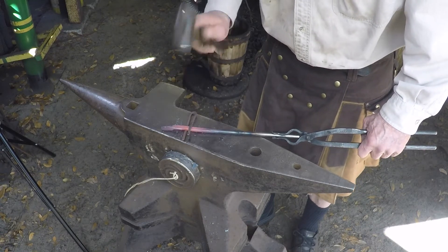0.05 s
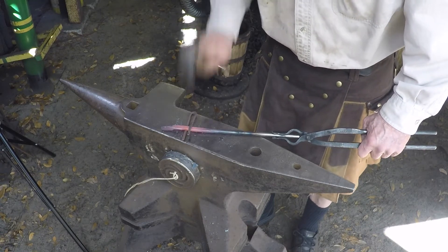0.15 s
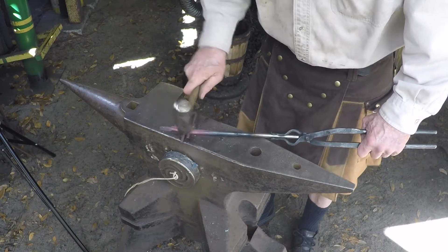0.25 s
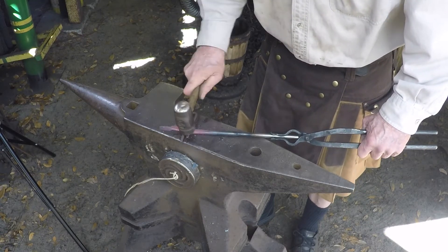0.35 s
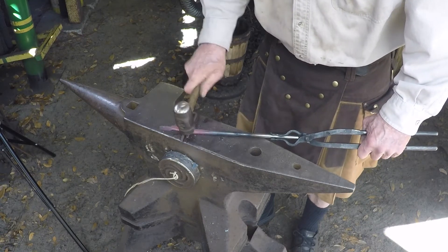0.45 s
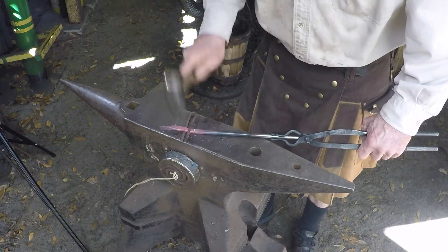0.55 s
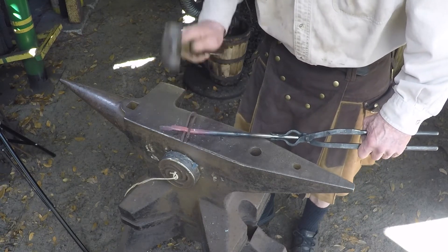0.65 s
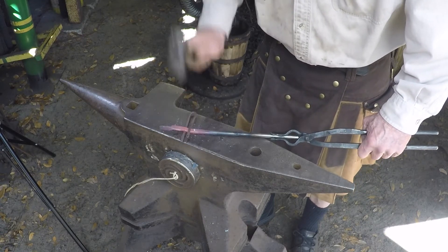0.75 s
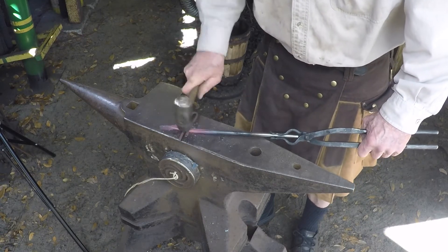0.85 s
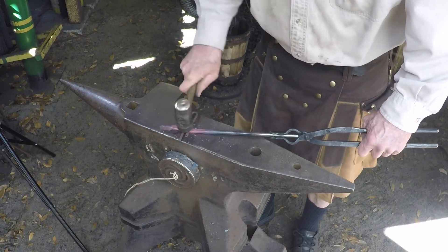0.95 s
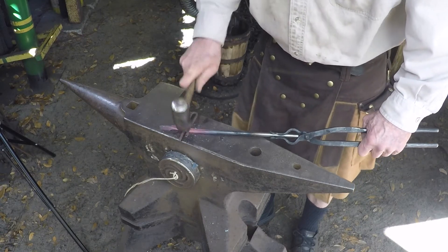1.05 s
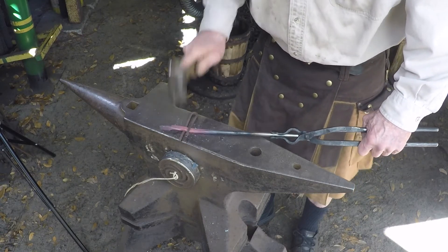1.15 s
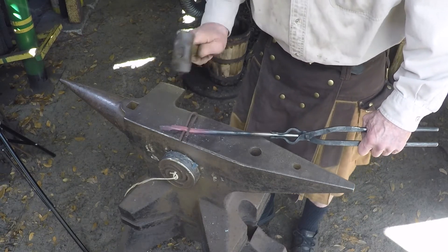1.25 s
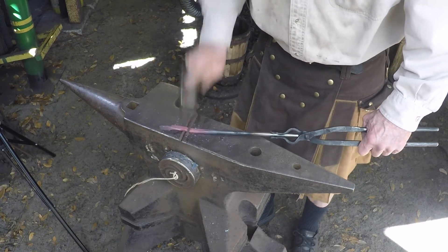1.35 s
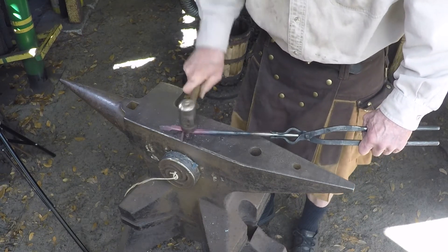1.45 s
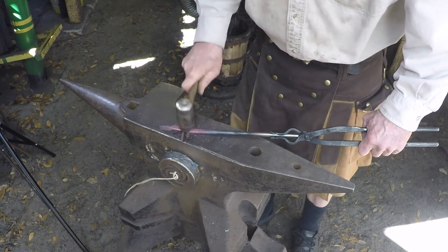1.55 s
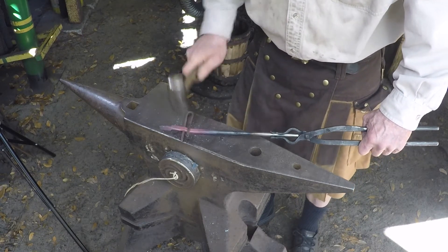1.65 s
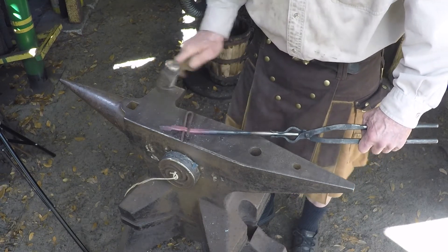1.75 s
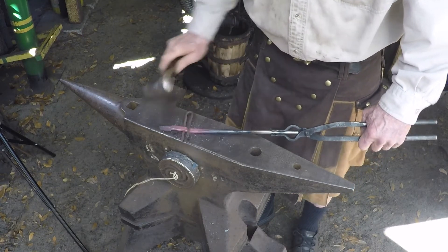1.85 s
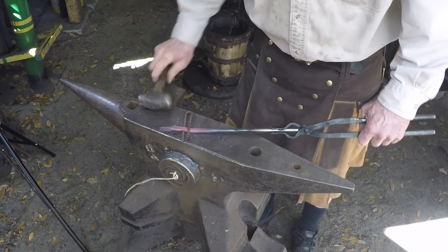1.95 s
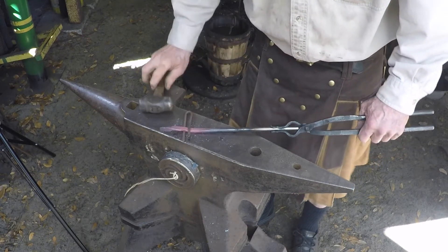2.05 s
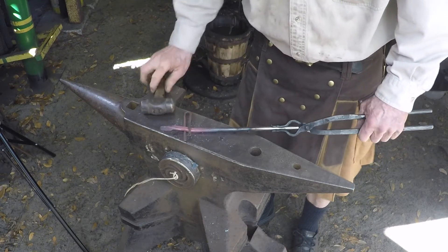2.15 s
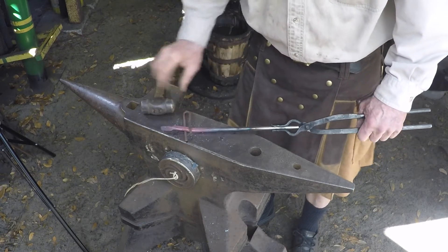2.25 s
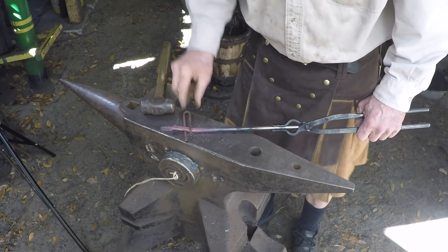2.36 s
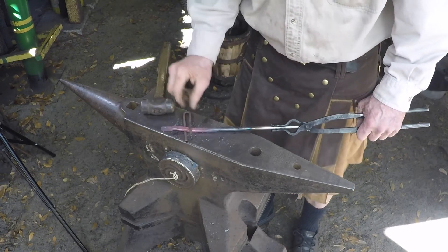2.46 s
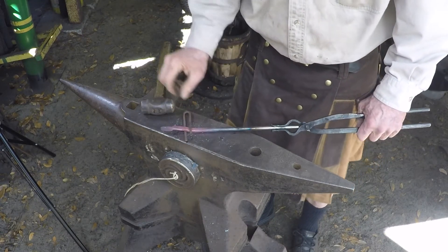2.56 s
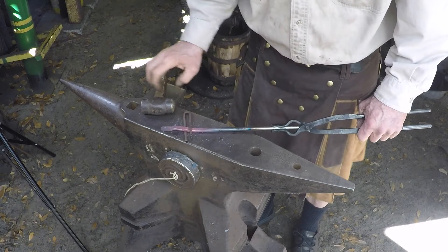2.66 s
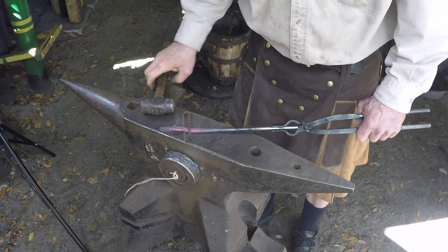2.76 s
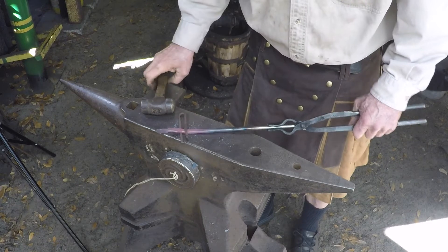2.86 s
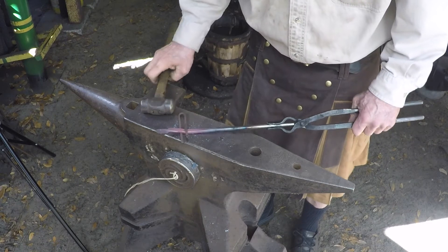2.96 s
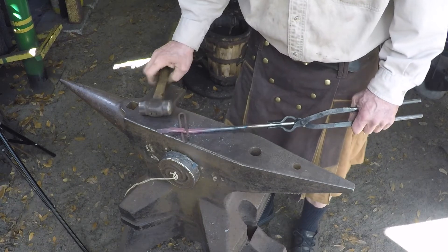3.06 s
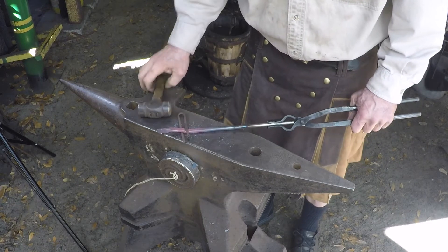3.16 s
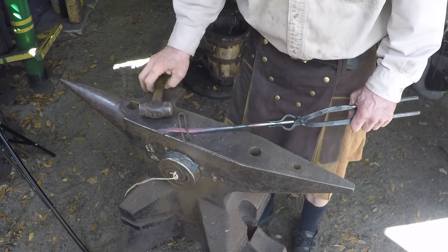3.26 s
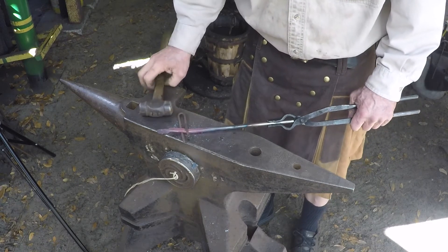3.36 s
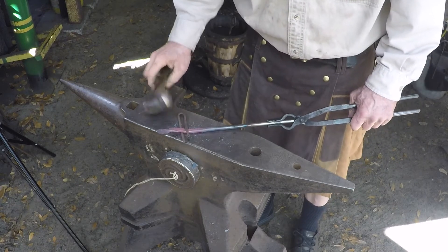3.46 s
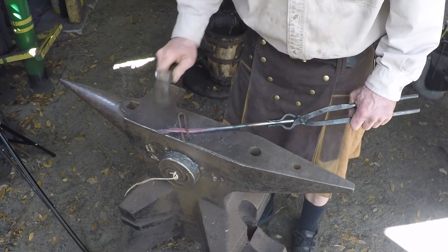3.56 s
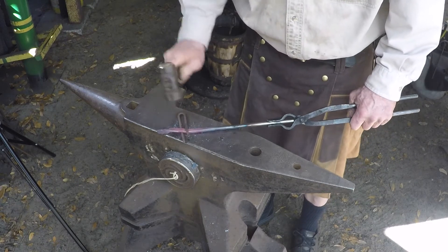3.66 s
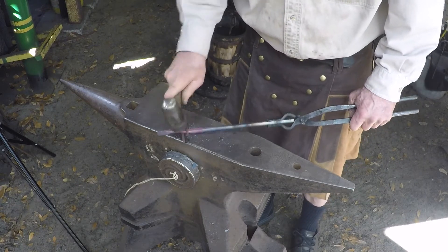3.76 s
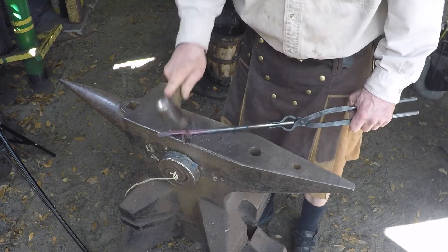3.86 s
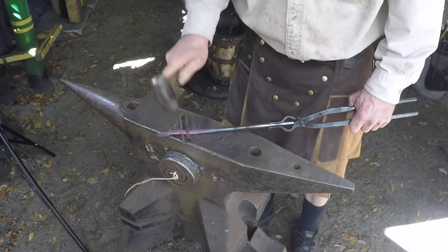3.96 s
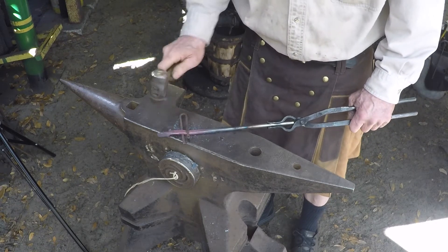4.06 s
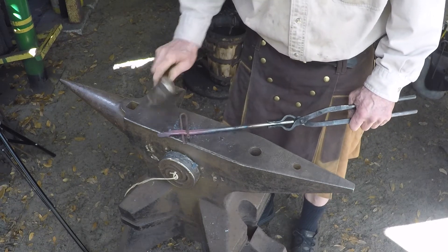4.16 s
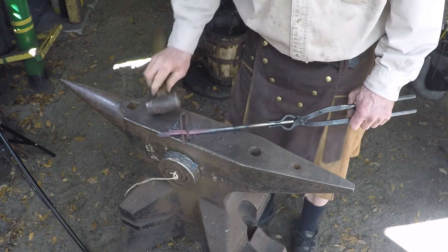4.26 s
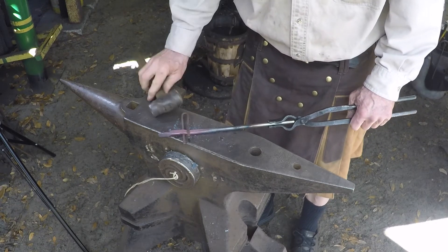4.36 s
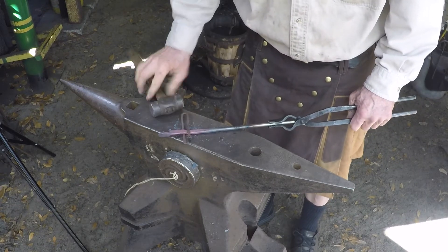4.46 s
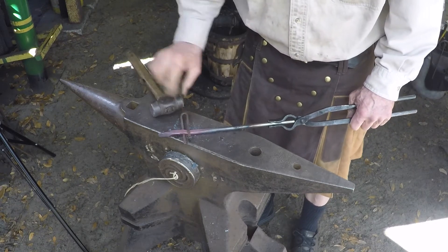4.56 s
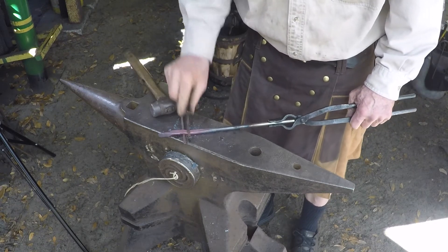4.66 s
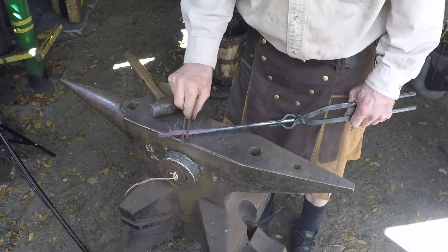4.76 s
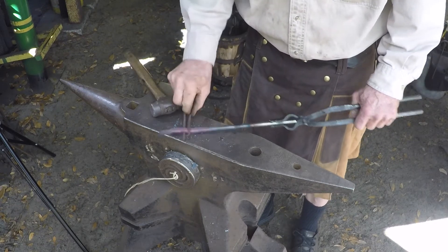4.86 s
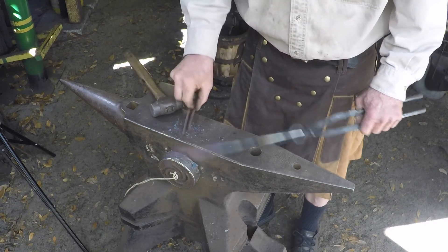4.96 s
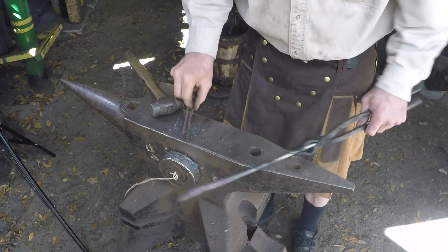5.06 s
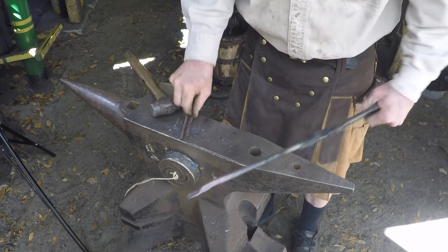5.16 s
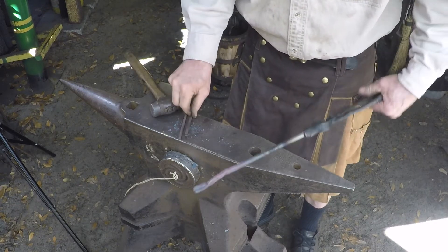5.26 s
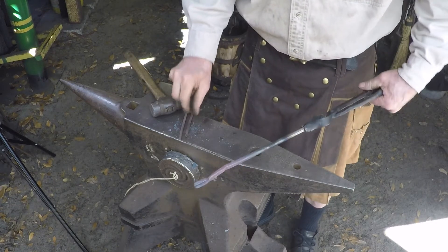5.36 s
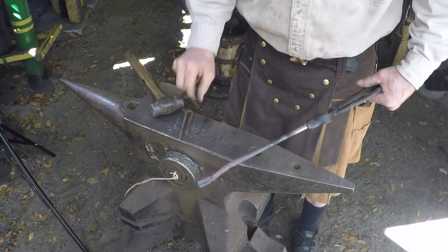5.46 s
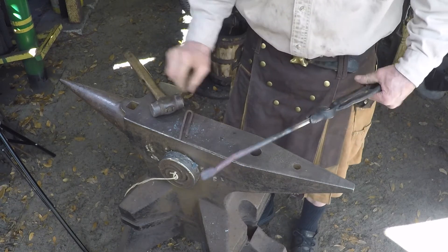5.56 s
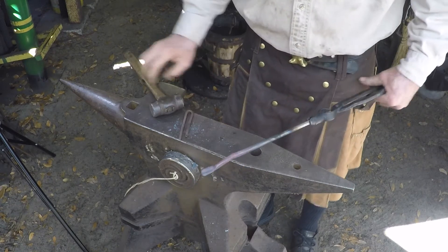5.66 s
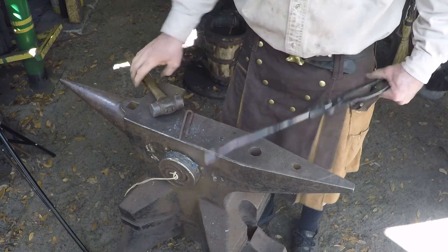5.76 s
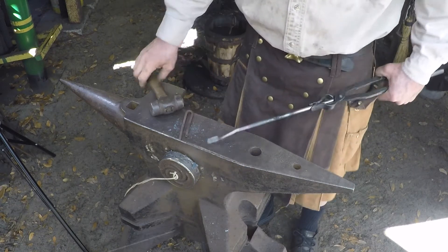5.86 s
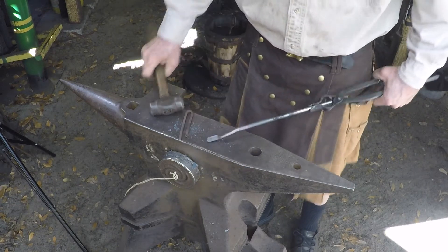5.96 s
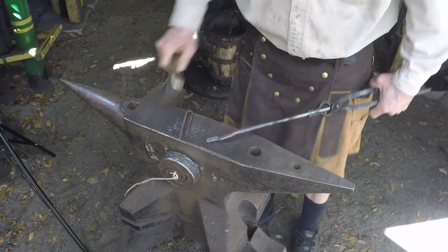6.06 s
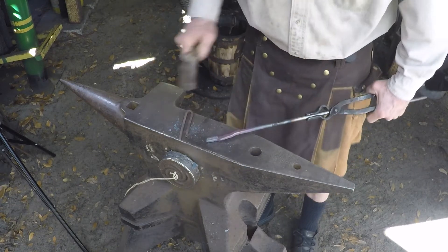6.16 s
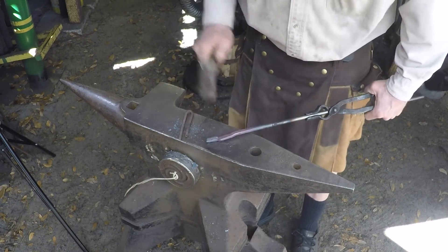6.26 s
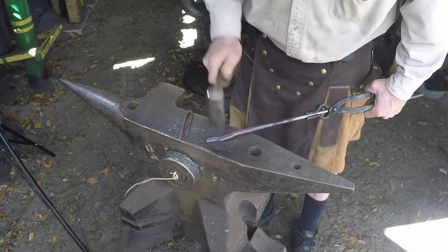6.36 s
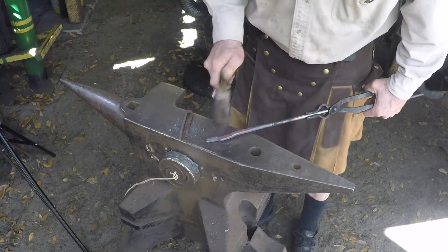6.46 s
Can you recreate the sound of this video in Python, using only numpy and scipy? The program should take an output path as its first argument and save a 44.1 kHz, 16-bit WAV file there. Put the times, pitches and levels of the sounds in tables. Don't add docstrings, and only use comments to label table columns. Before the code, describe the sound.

Close in an open shed, a hammer drives a small tool into hot iron on an anvil: three hard clanking blows with thud, crack and ring. The hammer then lands on the anvil face with a bright clang and quick chatter, rocks again softly, taps once, and drops with another ringing rattle. Small iron ticks follow. Low wind rumbles on the microphone.

```python
import sys
import numpy as np
from scipy import signal
from scipy.fft import rfft, irfft
from scipy.io import wavfile
from scipy.ndimage import uniform_filter1d

SR = 44100
rng = np.random.default_rng(int(sys.argv[2]) if len(sys.argv) > 2 else 0)


def magnitude_from_level(level_db):
    exponent = np.asarray(level_db, float) / 20
    return 10 ** exponent


def transcribe(signal):
    frames = np.atleast_2d(signal).T
    limited = np.clip(frames, -1, 1)
    pcm = np.round(limited * 32767).astype(np.int16)
    wavfile.write(sys.argv[1], SR, pcm)


N = 286914

ANVIL_HZ = [1120, 1357, 2234, 2412, 2794, 3381, 4258, 4420, 4484, 4904, 5211, 5450, 5696, 6261, 6481, 7407,
            7504, 7930, 8086, 8561, 8971, 9383, 10280, 10760, 12060, 12340, 13370, 13950, 14780, 15105]
ANVIL_T60 = [2.07, 0.27, 0.39, 0.18, 0.79, 0.26, 0.24, 0.72, 0.85, 3.21, 1.16, 1.29, 1.92, 0.81, 0.78, 0.3,
             0.35, 0.71, 0.29, 0.72, 0.34, 0.92, 0.41, 0.46, 0.81, 0.72, 0.97, 0.52, 0.75, 0.47]


def evened(x):
    return x / np.sqrt(np.mean(x ** 2) + 1e-20)


def read(points, hz):
    f, value = np.transpose(points)
    return np.interp(np.log(hz + 1), np.log(f + 1), value)


def add(mix, s, sound):
    part = mix[round(s * SR):][:len(sound)]
    part += sound[:len(part)]


def coloured(x, points):
    hz = np.fft.rfftfreq(len(x), 1 / SR)
    inside = (hz > points[0][0]) & (hz < points[-1][0])
    return evened(irfft(rfft(x) * magnitude_from_level(read(points, hz)) * inside, len(x)))


def ring(t, hz, db, t60, phase=0):
    return magnitude_from_level(db - 60 * t / t60) * np.sin(2 * np.pi * hz * t + phase)


def burst(t, rise, fall):
    return (1 - np.exp(-t / rise)) * np.exp(-t / fall)


def soft(t, contact):
    return np.sin(np.pi / 2 * np.clip(t / contact, 0, 1)) ** 2


def air():
    # (time [s], level [dB])
    wind_levels = [(0.0, -33.5), (0.16, -48.5), (0.36, -35.5), (0.65, -48.5), (1.21, -41), (1.49, -58.5),
                   (1.59, -39.5), (1.96, -48.5), (2.17, -36.5), (2.59, -51), (3.6, -50), (3.91, -45),
                   (4.29, -53.5), (4.46, -35.5), (4.73, -43.5), (5.0, -42.5), (5.8, -53), (6.51, -51)]
    # (frequency [Hz], level per Hz [dB])
    wind_colour = [(7.1, -36), (12, -1), (46, -3.5), (61, -6.5), (81, -10), (226, -31.5), (258, -28.5),
                   (400, -40.5), (520, -60.5), (880, -120)]
    # (frequency [Hz], level per Hz [dB])
    hush_colour = [(71, -30), (120, -1), (188, -11), (222, -8), (314, -10.5), (370, -11.5), (569, -14.5),
                   (605, -13.5), (949, -15), (1720, -28), (5080, -30), (14700, -43), (16000, -52.5)]
    hush_db, swell_db, swells_per_s = -53.5, 1.07, 2.2

    t = np.arange(N) / SR
    lumps = evened(uniform_filter1d(uniform_filter1d(rng.standard_normal(N), 1500), 1500))
    gusts = evened(coloured(rng.standard_normal(N), wind_colour) * magnitude_from_level(1.78 * lumps))
    wind = gusts * magnitude_from_level(np.interp(t, *np.transpose(wind_levels)) + 5.0)

    hz, frames = np.fft.rfftfreq(1024, 1 / SR), N // 256 + 5
    a, b, patches = rng.standard_normal((frames, 513, 3)).T
    patches = evened(uniform_filter1d(uniform_filter1d(patches, 10, 0), 14, 1))
    rates = np.geomspace(.2, swells_per_s, 20)
    moments = np.arange(frames) * 256 / SR
    swell = evened(sum(np.sin(2 * np.pi * (f * moments + rng.random())) / np.sqrt(f) for f in rates))
    low_db = swell_db * swell / (1 + (hz[:, None] / 1300) ** 4)
    level = magnitude_from_level(read(hush_colour, hz)[:, None] + low_db + 1.9 * patches)
    spectrum = (a + 1j * b) * level * (hz > 110)[:, None]
    hush = signal.istft(spectrum, nperseg=1024, noverlap=768)[1][:N]
    return wind + magnitude_from_level(hush_db) * evened(hush)


def blows():
    # (time [s], thud level [dB], crack level [dB], stump level [dB], tool shiver level [dB])
    struck = [
        (0.237, -1.5, -13, -25.5, -16),
        (0.86, 5, -12.5, -27.5, -17.5),
        (1.415, 6, -15, -25, -17),
        (3.787, -21.5, -25.5, -38, -30.5),
    ]
    # (time [s], thud level [dB], crack level [dB], stump level [dB], shiver level [dB])
    dropped = [
        (2.007, -24, -44, -44.5, -26),
        (3.112, -39, -64.5, -47.5, -49),
        (4.282, -39, -26, -39.5, -21.5),
    ]
    # (frequency [Hz], width [Hz], level [dB])
    thud_modes = [(970, 780, 11), (1300, 450, 2), (1956, 950, 8.5), (3390, 190, -21.5)]
    # (frequency [Hz], level per Hz [dB])
    crack_colour = [(880, -31), (1500, -27), (1725, 3), (2410, -34), (2720, -5), (5280, -10), (11100, -6),
                    (14300, -9), (16000, -31)]
    # (frequency [Hz], level per Hz [dB])
    shiver_colour = [(71, 14.5), (120, 1.5), (988, -1.5), (1120, -10.5), (1260, 0.5), (1370, -11.5),
                     (3740, -10), (5300, -3), (5990, -7.5), (15000, -28.5), (16000, -48.5)]
    # (frequency [Hz], level [dB], time to die by 60 dB [s])
    stump_modes = [(49, 4, 0.65), (90.7, 4, 0.41), (195, -8, 0.6), (460, 3.5, 0.091), (700, -42.5, 0.51)]
    # (delay [s], frequency [Hz], level [dB])
    far_wall = [(.075, 195, -30.5), (.1, 460, -32.5), (.17, 646, -41.5)]

    sharp, low, t = np.zeros(N), np.zeros(N), np.arange(SR // 2) / SR
    thud = sum(-ring(t, hz, db, 3.56 / width) for hz, width, db in thud_modes) * soft(t, 0.00072)
    for s, thud_db, crack_db, stump_db, shiver_db in struck + dropped:
        a, b = rng.standard_normal((2, len(t)))
        add(sharp, s, magnitude_from_level(thud_db + 0.5) * thud)
        add(sharp, s, magnitude_from_level(crack_db) * coloured(a, crack_colour) * burst(t, 0.00035, 0.0045))
        add(low, s, magnitude_from_level(shiver_db) * coloured(b, shiver_colour) * burst(t, 0.002, 0.042))
        stump = np.zeros(len(t))
        for hz, db, t60 in stump_modes:
            stump += ring(t, hz * rng.uniform(1.0, 1.04), db, t60, rng.uniform(0, 17))
        add(low, s, magnitude_from_level(stump_db + 4.5) * stump * (1 - np.exp(-t / 0.008)))
        for delay, hz, db in far_wall:
            answer = ring(t, hz * rng.uniform(0.96, 1.03), thud_db + db + 11.0, 0.13)
            add(low, s + delay, answer * soft(t, 0.042))
    return sharp, low


def anvil():
    # (time [s], strength [dB], place from horn to heel [about -1.2 to 0.6, 0 mid-face],
    strikes = [
        (.237, -14, 0.5, -0.58, -3.6),
        (.861, -9, 0.14, 0.41, -4.5),
        (1.414, -8, 0.15, 0.8, -1.7),
        (2.008, 0, -0.28, 0.016, 8),
        (3.161, -24.5, -1.18, 0.55, -4),
        (3.787, -24.7, 0.55, .41, 8),
        (4.279, 1.66, 0.37, -0.81, 21),
        (5.887, -43.5, .3, -0.55, 8),
    ]
    # (time of that contact [s], change of
    # the ring's level from then on [dB], damping by what rests on the face [1/s])
    mutes = [
        (.860, -22, 0.058),
        (1.414, -30, 0.053),
        (2.008, -35, 0.026),
        (2.87, -6.5, 0.21),
        (3.786, -12.5, 0.073),
        (4.280, -19.5, 0.065),
        (5.886, 2.5, 0.016),
        (6.4, -1, 0.22),
    ]
    # (level struck mid-face [dB], gain towards heel [dB], gain towards far edge [dB])
    shapes = [(-27.5, -5, 9), (-13.5, 2.5, 12.5), (-28, -7.5, -5.5), (-17.5, 12.5, 11), (-35.5, -18, -3.5),
              (-18, 0.5, -0.5), (-15.5, -6.5, -0.5), (-22.0, -4.5, -5), (-32, -21, -4.5), (-33, -8, 3),
              (-21.5, 1, 4), (-27, -7.5, 10), (-34, -7, 7.5), (-19.5, -5.5, -4.0), (-34.5, -8.0, 3.5),
              (-43, 4.5, 2.0), (-39.5, -10, -6.0), (-45, -5.5, -9.5), (-42, -2, -4), (-45, -1, -8.5),
              (-39.5, 8, -1.5), (-33, 1.5, 0), (-36.5, 14.5, 1.5), (-42.0, 15.5, -2), (-42, 12.5, -3),
              (-45.5, 12.5, -5.5), (-49.5, -4.5, -8), (-42.5, 18.5, -7.5), (-51.0, 0, 6.5),
              (-36.5, 13.0, -4.0)]
    flat_gains = [-5, -7.5, -3.5, 4.5, -2, -2.5, -2, -4, -4, -1.5, -1, 5.5, 4.5, 2, 6.5, -2, 0, 6, -1, 6.5,
                  -2, 4, 4, 6.5, 0, -2.5, -2, 1.5, -2, -1.5]
    flatness = [-0.12, -0.46, -.1, 0.9, -0.2, 0.079, 0.084, 0.097]
    build_times = [.016, .016, 0.011, 0.14, 0.04, .016, .03, 0.017]
    dull_hz = 11200

    out, t = np.zeros(N), np.arange(3 * SR) / SR
    phases = 2 * np.pi * rng.random((len(strikes), len(ANVIL_HZ)))
    top = 1 / (1 + (dull_hz / np.array(ANVIL_HZ)) ** 16)
    for strike, mute, flat, build, turns in zip(strikes, mutes, flatness, build_times, phases):
        s, force_db, along, across, dull_db = strike
        mute_s, left_db, load = mute
        tone = np.zeros(len(t))
        place_db = np.array(shapes) @ [1, along, across]
        levels_db = force_db + place_db + flat * np.array(flat_gains) - dull_db * top
        for hz, t60, db, phase in zip(ANVIL_HZ, ANVIL_T60, levels_db, turns):
            heard = t[:int(min(t60 * 1.1, 3) * SR)]
            loaded_t60 = 1 / (1 / t60 + abs(load))
            add(tone, 0, ring(heard, hz, db, loaded_t60, phase) * soft(heard, build * min(t60, 1)))
        muted = magnitude_from_level(left_db * soft(t - (mute_s - s), 0.022))
        swell = soft(t, 0.012)
        ending = np.minimum(1, 5 * (t[-1] - t))
        add(out, s, magnitude_from_level(2.5) * tone * swell * muted * ending)
    return out


def shed(x, echo_db, tail_db):
    # (delay [s], level [dB])
    echoes = [(.0032, -32), (0.0102, -11), (0.0113, -8), (.0185, -15), (.0222, -24.5), (.029, -25.5)]
    # (frequency [Hz], time to die by 60 dB [s])
    shed_t60 = [(150, 0.99), (700, 0.39), (2000, 0.28), (5000, 0.31), (12000, 0.24)]

    taps = np.zeros(SR)
    at = np.arange(60, SR - 20, 20)
    taps[at + rng.integers(0, 20, len(at))] = rng.choice([-1., 1.], len(at))
    hz, t, z = signal.stft(taps, SR, nperseg=256)
    dying = magnitude_from_level(-60 * t / read(shed_t60, hz)[:, None])
    tail = signal.istft(z * dying, SR, nperseg=256)[1][:SR]
    response = magnitude_from_level(tail_db) * tail / np.linalg.norm(tail)
    for s, db in echoes:
        add(response, s, np.array([magnitude_from_level(db + echo_db)]))
    return x + signal.fftconvolve(x, response)[:N]


def knock(t, handle_hz, head_hz, handle_db, edge_db):
    grit_band = signal.butter(4, [1500, 6000], "band", fs=SR, output="sos")
    steel_band = signal.butter(4, [4300, 7200], "band", fs=SR, output="sos")
    head = ring(t, head_hz, 0, .013) + ring(t, head_hz * 1.35, -8, .007) + ring(t, head_hz * .58, -11, .01)
    handle = ring(t, handle_hz, handle_db, .02) + ring(t, handle_hz * 1.5, handle_db - 14, .012)
    a, b = rng.standard_normal((2, len(t)))
    grit = magnitude_from_level(-4) * signal.sosfilt(grit_band, a * burst(t, .0003, 0.0024))
    edge = magnitude_from_level(edge_db + 2.5) * signal.sosfilt(steel_band, b * burst(t, 0.00054, 0.0014))
    return head * soft(t, .0015) + handle * soft(t, .0012) + grit + edge


def knocks(grains):
    # (time [s], head clack level [dB], handle frequency [Hz], head frequency [Hz])
    contacts = [(1.975, -8, 820, 3020), (2.0076, -5, 1340, 3284), (2.0263, -8.5, 800, 3100),
                (2.0799, 0.3, 753, 3240), (2.112, -15, 1080, 3430), (2.1399, -14, 760, 3014),
                (2.1692, -20, 1040, 3500), (2.2036, -22, 1020, 3260), (2.2539, -43, 1080, 3460),
                (3.1139, -10, 820, 3160), (3.1619, -14.5, 790, 3160), (3.198, -13, 1150, 3300),
                (3.247, -15, 800, 3300), (3.2812, -30, 1150, 3040), (3.2934, -24, 830, 3200),
                (4.2659, -10.5, 840, 3100), (4.2803, -.6, 1323, 2400), (4.3314, 0.8, 1147, 2590),
                (4.4038, -13, 944, 2400), (4.4153, -30.5, 1130, 3390), (4.4294, -26, 780, 3280),
                (4.4506, -14.5, 1330, 3070), (4.4786, -20, 1260, 3250), (4.5, -19, 1029, 2430),
                (4.538, -25.5, 789, 3290), (4.5802, -25, 1050, 3430), (4.6044, -25, 903, 3190),
                (4.6244, -23, 874, 2380), (4.67, -44, 1310, 3380), (4.7146, -40.5, 1080, 2122)]
    quick_modes = [1, 2, 3, 5, 6, 7, 11]
    quick_levels = [-26, -28.5, -28.5, -28, -27.5, -34.5, -40.5]
    handle_base_db, handle_lean = -8.5, 0.34
    edge_base_db, edge_db_per_oct, heel_hz = -23, 30.5, 780
    steel_lean = 0.56

    out, pushes, t = np.zeros(N), magnitude_from_level(-19) * grains, np.arange(SR) / SR
    for s, db, handle_hz, head_hz in contacts:
        edge_db = edge_base_db + edge_db_per_oct * np.log2(handle_hz / heel_hz)
        sound = knock(t[:2000], handle_hz, head_hz, handle_base_db - handle_lean * db, edge_db)
        add(out, s - .0005, magnitude_from_level(db + 2.0) * sound)
        add(pushes, s, np.array([magnitude_from_level(steel_lean * db)]))
    quick = sum(ring(t, ANVIL_HZ[k], db, ANVIL_T60[k]) for k, db in zip(quick_modes, quick_levels))
    return out, signal.fftconvolve(pushes, quick * soft(t, 0.011))[:N]


def chatter():
    # (start [s], loudest [s], rest [s])
    settles = [
        (2.016, 2.144, 2.274),
        (3.1, 3.14, 3.295),
        (4.3, 4.46, 4.71),
    ]
    # (level [dB], fade [dB/s])
    strengths = [
        (-40.5, 114),
        (-44.5, 10.5),
        (-41.5, 61),
    ]
    rise_db, rest_db_per_s = 32, 270

    t, level = np.arange(N) / SR, np.zeros(N)
    happens = rng.random(N) < 180 / SR
    size = magnitude_from_level(4 * np.minimum(rng.exponential(1, N), 2.5)) * happens
    kind, grains = rng.integers(0, 12, N), np.zeros(N)
    pitches = rng.uniform([700, 2100], [1300, 4200], (12, 2))
    for k, (handle_hz, head_hz) in enumerate(pitches):
        sound = knock(t[:2000], handle_hz, head_hz, -1.5, -2.5)
        grains += signal.oaconvolve(size * (kind == k), sound)[:N]
    for (start, top, rest), (db, fade) in zip(settles, strengths):
        shy_db = rise_db * np.maximum(top - t, 0) / (top - start)
        lost_db = fade * (np.clip(t, top, rest) - top) + rest_db_per_s * np.maximum(t - rest, 0)
        level += magnitude_from_level(db + 9.0 - shy_db - lost_db) * (t > start)
    return evened(grains) * level


def small_iron():
    # (time [s], level [dB])
    tinks = [
        (5.1592, -38.5),
    ]
    # (frequency [Hz], level [dB], time to die by 60 dB [s])
    tink_modes = [(5970, -2, .14), (7079, -9, .14), (8393, -12, .2), (9410, 0, .12), (11750, 1, .2),
                  (14830, -2, .12)]
    # (time [s], level [dB], fall [s], centre frequency [Hz], width [octaves])
    ticks = [
        (5.355, -70, .01, 6880, 1.2),
        (5.46, -66, .0067, 5940, .66),
        (5.685, -46, .002, 8500, .99),
        (5.8855, -45, .002, 5150, .25),
        (5.887, -44, .0012, 10500, .45),
        (5.888, -54, .014, 1500, 1.0),
        (5.893, -48, .022, 4140, .58),
        (6.029, -65, .018, 2500, 1.4),
        (6.228, -61, .005, 1200, .8),
    ]
    # (time [s], level [dB], fall [s], centre frequency [Hz], width [octaves])
    scuffs = [
        (3.51, -56.5, 0.0289, 700, 0.37),
        (4.9, -58, 0.031, 3500, 1.1),
        (4.92, -71, .02, 11600, .2),
        (5.59, -69, 0.051, 2480, .48),
    ]

    out, t = np.zeros(N), np.arange(SR // 4) / SR
    tink_s, tink_db = tinks[0]
    add(out, tink_s, magnitude_from_level(tink_db - 10.5) * sum(ring(t, *mode) for mode in tink_modes))
    hz = np.fft.rfftfreq(len(t), 1 / SR) + 1
    rises = [.001] * len(ticks) + [.035] * len(scuffs)
    for rise, (s, db, fall, centre_hz, octaves) in zip(rises, ticks + scuffs):
        band = np.exp(-.5 * (np.log2(hz / centre_hz) / octaves) ** 2)
        grit = evened(irfft(rfft(rng.standard_normal(len(t))) * band, len(t)))
        fading = np.exp(-np.maximum(t - rise, 0) / fall)
        add(out, s, magnitude_from_level(db + 5.5) * grit * soft(t, rise) * fading)
    return out


def scene():
    sharp, low = blows()
    grains = chatter()
    taps, hum = knocks(grains)
    struck = shed(sharp, echo_db=-3.5, tail_db=-6)
    hammer = shed(taps + grains + small_iron(), echo_db=2.5, tail_db=-5.5)
    return (struck + hammer + low + hum + anvil() + air())[None]


def roll_off(x):
    return signal.sosfilt(signal.butter(12, 16540, fs=SR, output="sos"), x)


def record(dry):
    power_db = 10 * np.log10(abs(uniform_filter1d(dry[0] ** 2, 600, origin=299)) + 1e-12)
    fall = np.arange(N) * 34.0 / SR
    held_db = np.maximum.accumulate(power_db + fall) - fall
    over_db = np.maximum(held_db + 34.0, 0)
    ducked = dry / magnitude_from_level(0.13 * uniform_filter1d(over_db, 400))
    limited = np.tanh(ducked / .97) * .97
    edged = signal.oaconvolve(limited, signal.firwin(61, 15700, fs=SR)[None], "same")
    return roll_off(edged)


dry = scene()
out = record(dry)
transcribe(out)
```